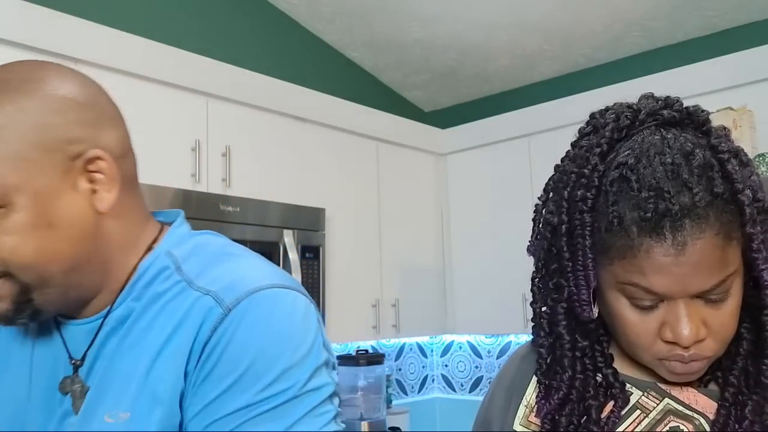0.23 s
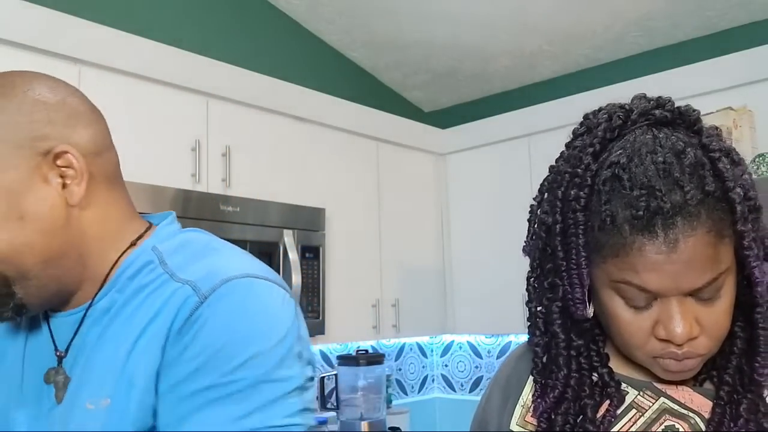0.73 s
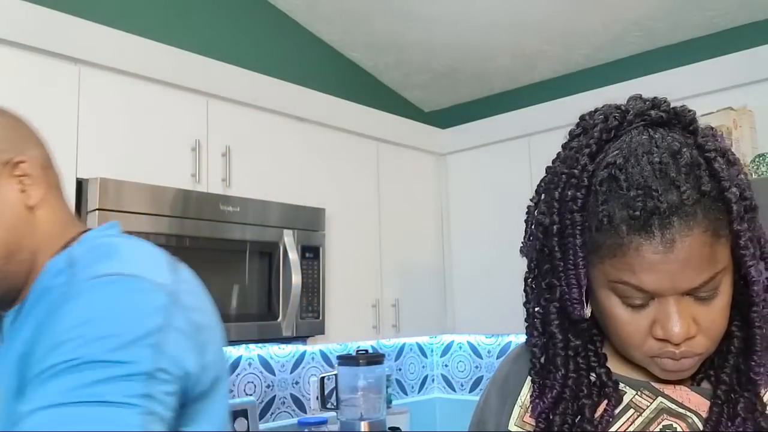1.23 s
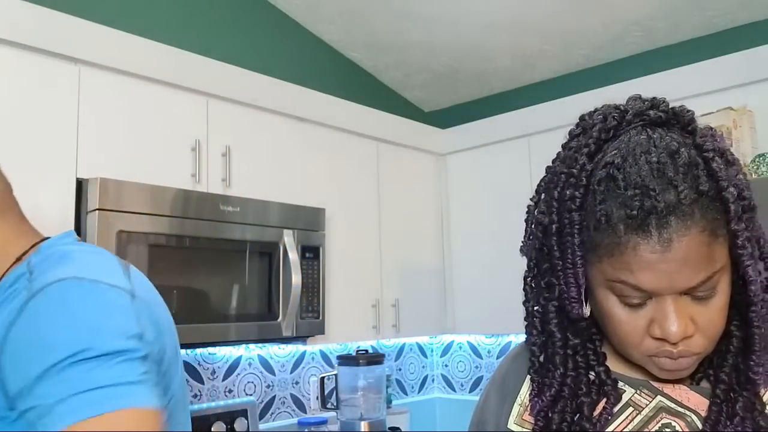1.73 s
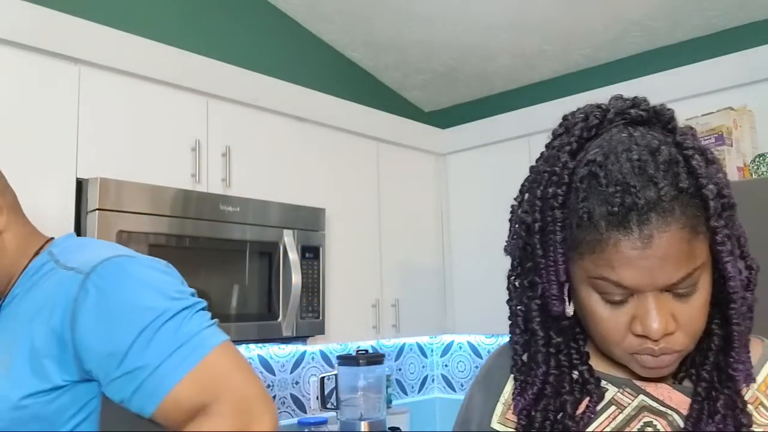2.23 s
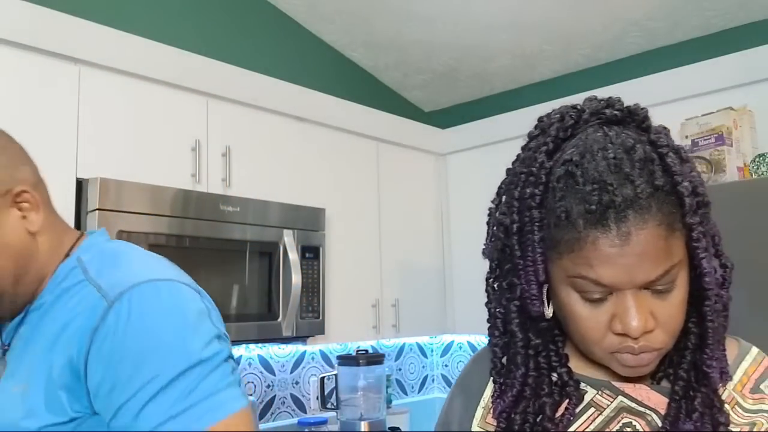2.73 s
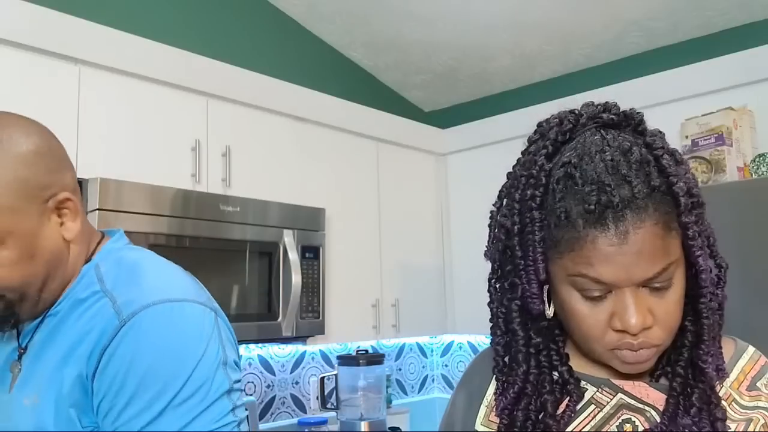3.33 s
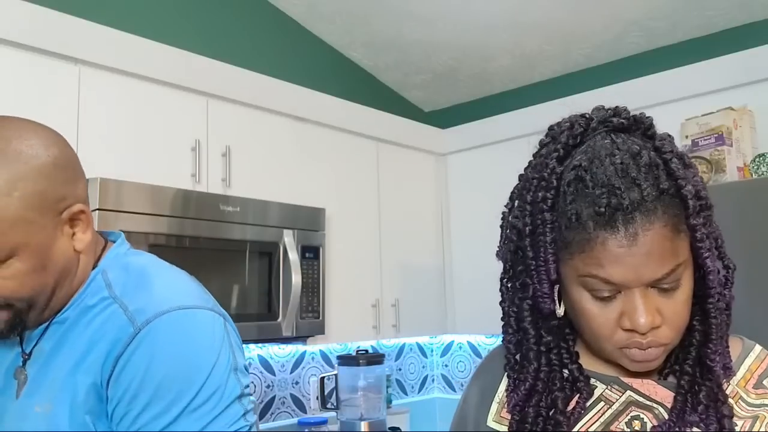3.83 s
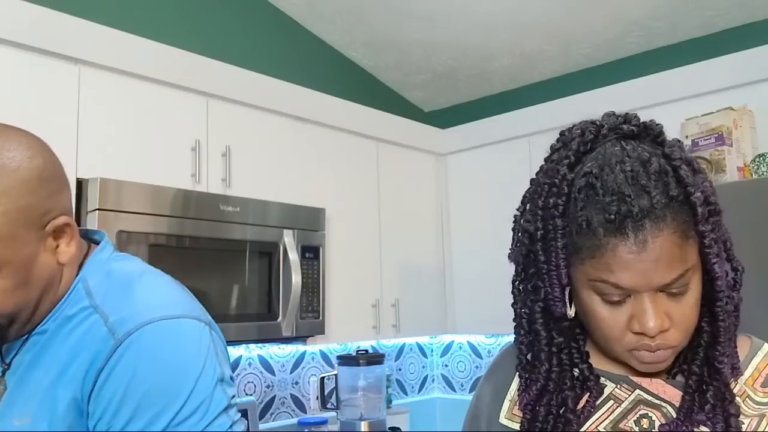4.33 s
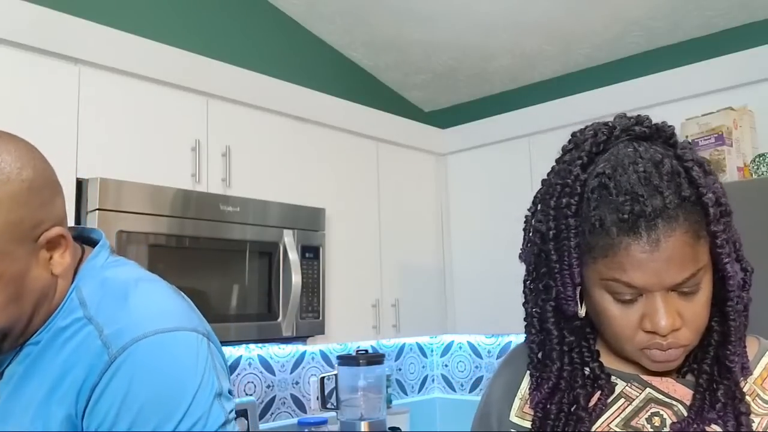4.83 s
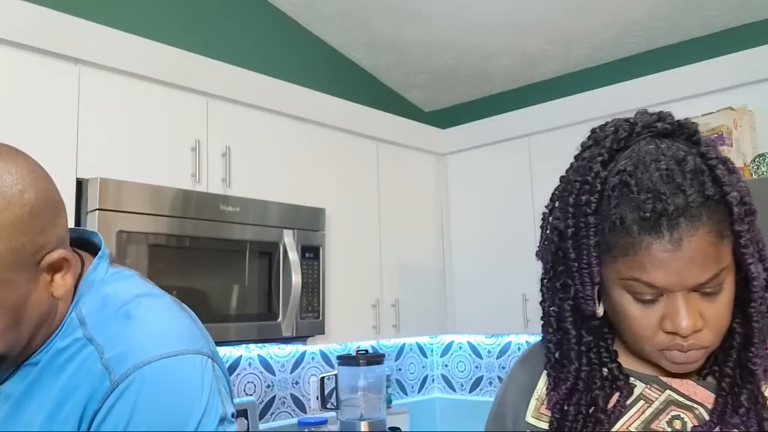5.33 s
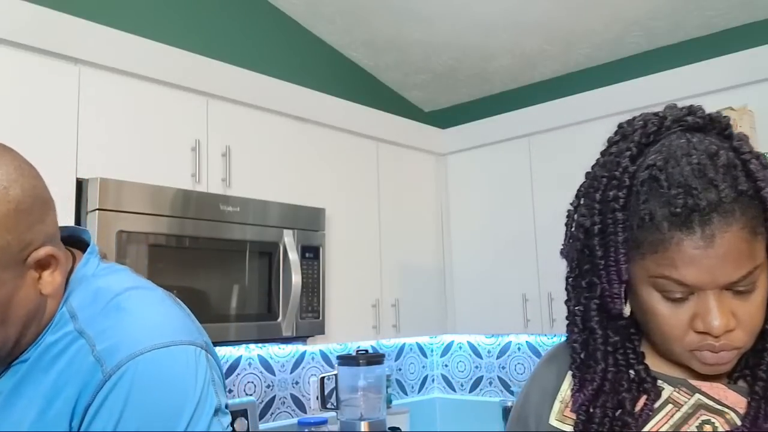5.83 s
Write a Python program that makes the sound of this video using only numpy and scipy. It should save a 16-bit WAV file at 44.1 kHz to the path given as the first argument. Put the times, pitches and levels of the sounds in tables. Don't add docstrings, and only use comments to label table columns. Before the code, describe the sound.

A knife cuts firm fruit on a board, heard close with short hard-room reflections. Small taps and a sliding scrape come first, then the loudest thud, a rumbling metallic rattle and woody rebounds. After a gap, several quick blows crack the rind amid ringing blade noise. Subdued rubs, soft bumps and low room hum follow, ending with crisp little cuts and light knocks.

```python
import sys
import numpy as np
from scipy import signal
from scipy.fft import rfft, irfft
from scipy.io import wavfile
from scipy.ndimage import uniform_filter1d

SR = 44100
rng = np.random.default_rng(int(sys.argv[2]) if len(sys.argv) > 2 else 0)


def gain_from_db(level_db):
    decades = np.asarray(level_db, float) / 20
    return 10 ** decades


def master(y):
    cut = np.clip(np.atleast_2d(y).T, -1, 1)
    pcm = np.round(cut * 32767)
    wavfile.write(sys.argv[1], SR, pcm.astype(np.int16))


N = 268745


def rms_one(x):
    return x / np.sqrt(np.mean(x ** 2) + 1e-20)


def highpass(x, hz):
    return signal.sosfilt(signal.butter(2, hz, "high", fs=SR, output="sos"), x)


def bandpass(x, order, low_hz, high_hz):
    return signal.sosfilt(signal.butter(order, [low_hz, high_hz], "band", fs=SR, output="sos"), x)


def at_hz(points, hz):
    table_hz, values = np.transpose(points)
    return np.interp(np.log(hz + 1), np.log(table_hz), values)


def envelope(curve):
    time_s, level_db = np.transpose(curve)
    return gain_from_db(np.interp(np.arange(N) / SR, time_s, level_db, left=-200, right=-200))


def swells(peak_s, db, rise_s, fall_s, edge, bend):
    t = np.arange(0, N + 16, 16)[:, None] / SR - peak_s
    loss = np.maximum(-t / rise_s, 0) ** edge + np.maximum(t / fall_s, 0) ** bend
    gain = gain_from_db(np.max(db - 20 * loss, axis=1))
    return np.interp(np.arange(N) / 16, np.arange(len(t)), gain)


def colour(x, spectrum):
    cepstrum = irfft(np.log(gain_from_db(at_hz(spectrum, np.fft.rfftfreq(4096, 1 / SR)))))
    cepstrum[1:2048] *= 2
    cepstrum[2049:] = 0
    taps = irfft(np.exp(rfft(cepstrum)))
    return signal.fftconvolve(x, taps / np.sqrt(np.sum(taps ** 2)))[:N]


def grains(per_s, spread_db):
    sizes = gain_from_db(spread_db * np.minimum(rng.exponential(1, N), 5)) * rng.choice([-1, 1], N)
    return rms_one(sizes * (rng.random(N) < per_s / SR))


def ring(x, hz, t60_s):
    radius = gain_from_db(-60 / (t60_s * SR))
    w = 2 * np.pi * hz / SR
    return signal.lfilter([0, np.sin(w)], [1, -2 * radius * np.cos(w), radius ** 2], x + 1e-18)


def body(drive, pitches_hz, modes, patchy_db):
    out = np.zeros(N)
    live = np.flatnonzero(np.abs(drive) > 1e-7)
    span = slice(live[0], live[-1] + SR // 2)
    steps = np.arange(len(drive[span])) / 1024
    wander = gain_from_db(patchy_db * rng.standard_normal((len(modes), int(steps[-1]) + 2)))
    for hz, (width_hz, db), feed in zip(pitches_hz, modes, wander):
        fed = drive[span] * np.interp(steps, np.arange(len(feed)), feed)
        t60_s = np.log(1000) / (np.pi * width_hz)
        out[span] += gain_from_db(db) * rms_one(ring(fed, hz, t60_s))
    return out * np.std(drive[span])


def strike(hits, modes, spread_db):
    out = np.zeros(N)
    time_s, hit_db = np.transpose(hits)
    at = [round(s * SR) for s in time_s]
    luck = rng.standard_normal((len(modes), len(at)))
    for (hz, db, t60_s), mode_luck in zip(modes, luck):
        clicks = np.zeros(N)
        clicks[at] = gain_from_db(hit_db + db + spread_db * mode_luck)
        out += ring(clicks, hz, t60_s)
    return out


def board():
    # (time [s], peak level [dB], knock pitch [Hz], contact length [s], board ring [dB])
    chops = [(0.246, -31, 330, 0.005, -8.5), (0.286, -33, 240, 0.006, -5), (0.488, -49, 990, 0.0041, -2.5),
             (1.128, -15.5, 252, 0.00087, -17.5), (1.135, -7.5, 270, 0.0071, 3),
             (2.128, -30, 263.5, 0.0092, -2), (2.131, -33, 527, 0.0081, -7),
             (2.184, -35.5, 485, 0.012, -16), (2.2575, -19, 720, 0.005, -4), (2.2435, -30, 497, 0.002, -14),
             (2.275, -16.5, 288, 0.01, -7), (2.292, -18, 417, 0.0056, -5.5), (2.268, -24, 800, 0.0067, 1),
             (2.329, -18.5, 326.2, 0.0041, -5), (2.341, -25.5, 480, 0.013, -7)]
    # (time [s], peak level [dB], knock pitch [Hz], contact length [s], board ring [dB])
    knocks = [(1.385, -12.5, 235, 0.0072, -27), (1.453, -21, 200, 0.0066, -22),
              (1.51, -30, 200, 0.0073, -12), (2.809, -51.5, 418, 0.01, 29.5),
              (2.868, -35.5, 257, 0.014, -6), (3.571, -47.5, 246.6, 0.035, -1),
              (4.322, -40, 254, 0.0066, -6), (5.259, -51, 249.6, 0.0089, -16),
              (5.698, -40.5, 257.7, 0.032, 11.5), (5.731, -42, 257, 0.012, -9),
              (5.822, -22, 423, 0.0036, -6.5), (5.828, -27, 496, 0.0069, -12),
              (5.861, -33, 253, 0.0077, -5), (5.892, -36.5, 249, 0.007, 9.5),
              (5.906, -37.5, 450, 0.0079, -16), (6.01, -34, 258, 0.0049, 3.5), (2.2513, 0, 325, 0.004, -15),
              (2.2467, 1.5, 932, 0.0015, -12), (2.2551, -1.5, 560, 0.0015, -14),
              (2.2712, -9.5, 880.4, 0.002, -8), (2.136, -28, 278, 0.0094, -11),
              (2.228, -34, 520, 0.008, -10), (1.1305, -9, 343, 0.0033, -22), (0.268, -33, 480, 0.008, -10)]
    # (frequency [Hz], level [dB], t60 [s])
    board_modes = [(250, -6, 0.22), (297, 4, 0.086), (320, -2, 0.067), (463, -1, 0.19), (572, -4, 0.18),
                   (700, -2, 0.25), (860, -8, 0.14), (1220, -12, 0.12)]
    blows = [(*row, -1.5, 0.00027) for row in chops] + [(*row, -26, 0.00075) for row in knocks]
    direct, ring_drive, t = np.zeros(N), np.zeros(N), np.arange(4000) / SR
    for s, db, hz, length_s, ring_db, rough_db, soft_s in blows:
        crush = rms_one(bandpass(rng.standard_normal(len(t)), 3, 220, hz * 3))
        swing = np.sin(2 * np.pi * hz * t) + gain_from_db(rough_db) * crush
        shape = (1 - np.exp(-(t / soft_s) ** 2)) * np.exp(-t / length_s)
        start = round(s * SR)
        blow = (gain_from_db(db) * swing * shape)[:N - start]
        direct[start:][:len(t)] += blow
        ring_drive[start:][:len(t)] += gain_from_db(ring_db) * blow
    ringing = sum(gain_from_db(db) * ring(ring_drive, hz, t60_s) for hz, db, t60_s in board_modes)
    return direct + gain_from_db(-58.5) * ringing


def tray():
    pitches_hz = [565, 685, 915, 965, 1030, 1169, 1310, 1677, 1776, 2048, 2137, 2185, 2234, 2573, 2830,
                  3250, 4043, 4807, 5450]
    # (width [Hz], level [dB])
    tray_modes = [(30, -18), (15.93, -5), (13.92, -21.5), (16.14, -29.5), (15.33, -15), (16.18, -11.5),
                  (15.86, -9.5), (16, -11.5), (18, -15), (34, -8), (30, -10.5), (30, -12), (30, -14),
                  (21.94, -9.5), (25, -20), (60, -25), (60, -23.5), (40.5, -23), (36.53, -28)]
    # (frequency [Hz], density [dB per Hz])
    buzz = [(60, -18.5), (130, -9), (300, -4), (600, -19), (1200, -12), (2200, -13.5), (3000, -28),
            (5000, -22.5), (8000, -46), (15500, -43)]
    times_s = np.cumsum([1.132, 0.021, 0.27, 0.13])
    shake = np.c_[times_s, [-45, -20, -39, -65]]
    drive = envelope(shake) * grains(4000, spread_db=2.5)
    modal = body(drive, pitches_hz, tray_modes, patchy_db=7)
    return gain_from_db(-12.5) * modal + gain_from_db(-3) * colour(drive, buzz)


def steel():
    # (peak time [s], level [dB], 20 dB rise [s], 20 dB fall [s], ring share [dB])
    clatter = [
        (.249, -44.5, 0.0087, 0.036, -12),
        (.36, -60.5, 0.0497, 0.054, -13),
        (.44, -53, 0.027, 0.028, -12.5),
        (.486, -72, 0.0093, 0.057, -19),
        (2.133, -25.5, 0.0087, 0.033, 4.5),
        (2.201, -29, 0.059, .07, 2.5),
        (2.236, -24, 0.022, 0.07, -3),
        (2.26, -21, 0.025, 0.07, -4),
        (2.292, -18, 0.016, 0.07, -3),
        (2.312, -20, 0.05, .13, -0.5),
    ]
    pitches_hz = [3676, 4421, 4790, 5443, 5675, 5822, 7000, 7817, 8219, 8463, 9420, 9823, 10100, 10530,
                  11150, 11681, 11960, 12250, 12890, 13900]
    # (width [Hz], level [dB])
    blade_modes = [(55, -16.5), (45, -11.5), (60, -17), (35, -17.5), (49.76, -14), (50, -9.5),
                   (49.7, -25.5), (44.7, -19), (45, -8), (45, -11), (39, -16), (40, -5), (45, -12),
                   (50.08, -5), (50, -20), (45, 0), (44.8, -10.5), (60.3, -9), (60, -15.5), (55, -12.5)]
    # (frequency [Hz], density [dB per Hz])
    rasp = [(300, -28.5), (600, -8.5), (1200, -6.5), (2500, -21), (4400, -6.5), (6300, -8.5), (9000, -11),
            (11000, -4), (13500, 3), (15800, -4)]
    # (time [s], level [dB])
    long_touches = [
        (2.35, -58),
        (2.405, -52),
    ]
    # (frequency [Hz], level [dB], t60 [s])
    long_modes = [(4421, 0, .8), (4423.2, -2, .68), (4434, -6, .6), (4404, -7, .45)]
    s, db, rise_s, fall_s, share_db = np.transpose(clatter)
    contacts = grains(9000, spread_db=2.5)
    rasp_drive = contacts * swells(s, db, rise_s, fall_s, edge=1.6, bend=1.2)
    ring_drive = contacts * swells(s, db + share_db, rise_s, fall_s, edge=1.6, bend=1.2)
    rings = body(ring_drive, pitches_hz, blade_modes, patchy_db=6)
    lasting = strike(long_touches, long_modes, spread_db=2.5)
    return gain_from_db(-8) * rings + gain_from_db(-1.5) * colour(rasp_drive, rasp) + lasting


def strokes():
    # (peak time [s], fizz level [dB], 20 dB rise [s], 20 dB fall [s], rub over fizz [dB])
    slices = [
        (2.81, -78, 0.04, 0.14, 12),
        (2.834, -64.5, 0.012, 0.14, 9.5),
        (2.915, -64.5, 0.0202, 0.13, 7.5),
        (5.07, -61.5, 0.127, 0.14, -2.5),
        (5.374, -53.5, 0.047, 0.11, 3.5),
        (5.5, -74, 0.11, 0.37, 1.5),
        (5.725, -57, 0.064, 0.13, 1.8),
        (5.86, -75, 0.15, 0.38, 11),
        (6.002, -52.5, 0.011, 0.21, -5.5),
        (6.045, -55, 0.063, 0.15, 0),
    ]
    # (peak time [s], fizz level [dB], 20 dB rise [s], 20 dB fall [s], rub over fizz [dB])
    brushes = [
        (.442, -71, 0.015, 0.035, -13),
        (3.624, -89, 0.066, 0.11, 10.5),
        (3.818, -89, .05, .12, 9.5),
        (3.976, -86, 0.0037, 0.051, 12),
        (4.165, -86, 0.024, .07, -1),
        (4.6, -88, 0.024, 0.064, -16.5),
        (4.68, -71.5, 0.03, 0.11, -21),
        (4.77, -74.5, 0.088, 0.12, -18.5),
        (4.86, -90.5, 0.09, .1, 15.5),
        (5.0, -66.5, 0.069, 0.23, -8),
    ]
    # (peak time [s], fizz level [dB], 20 dB rise [s], 20 dB fall [s], rub over fizz [dB])
    drags = [
        (0.03, -86.5, 0.12, 0.16, 8),
        (0.085, -84, .05, .08, 0),
        (0.256, -44.5, 0.0074, 0.17, 0),
        (0.488, -63.5, 0.023, 0.12, 7.5),
        (0.626, -72.5, 0.0077, 0.1, 5),
        (.68, -74.5, 0.013, 0.062, 9),
        (.78, -71, 0.26, 0.67, -0.3),
        (1.0, -66, 0.05, 0.2, -4.5),
    ]
    # (frequency [Hz], density [dB per Hz])
    fibres = [(2060, -29.5), (3500, -6.5), (3710, -5), (6230, -2), (7520, -8.5), (8280, 0.5), (9500, -11),
              (12400, -32), (20900, -120)]
    # (frequency [Hz], density [dB per Hz])
    flesh = [(180, -25), (300, -5.5), (529, 1), (870, -7.5), (1780, -9.5), (2280, -12.5), (4500, -18.5),
             (5850, -43.5), (9900, -120)]
    # (frequency [Hz], density [dB per Hz])
    skin = [(5290, -37), (9000, -7.5), (11300, -1.5), (15100, -5), (15800, -3.5)]
    hollows_hz = [520, 1400, 1800, 2300, 2650]
    # (width [Hz], level [dB])
    hollows = [(150, -8.5), (200, -6.5), (200, -6), (250, -6), (250, -9.5)]
    s, db, rise_s, fall_s, rub_db = np.transpose(slices + brushes + drags)
    skin_db = np.repeat([-2, 6, -4.5], [len(slices), len(brushes), len(drags)])
    tearing = grains(10000, spread_db=3.5)
    fizz = swells(s, db, rise_s, fall_s, edge=2.3, bend=0.92) * colour(tearing, fibres)
    rub = swells(s, db + rub_db, rise_s, fall_s, edge=2.3, bend=0.92) * grains(3000, spread_db=3)
    skin_s = s - np.minimum(0.008, rise_s / 4)
    fine = swells(skin_s, db + skin_db, rise_s, fall_s * 0.84, edge=2.3, bend=1.1) * colour(tearing, skin)
    hollow = body(rub, hollows_hz, hollows, patchy_db=7)
    return gain_from_db(-5) * fizz + gain_from_db(1.5) * colour(rub, flesh) + gain_from_db(-9.5) * hollow + gain_from_db(4) * fine


def ticks():
    # (time [s], peak level [dB], pitch [Hz], length [s])
    tick_events = [(0.2485, -19, 8150, 0.0036), (0.369, -38, 8000, 0.0083), (0.442, -67, 8470, 0.0045),
                   (0.626, -49, 7800, 0.0066), (0.679, -49.5, 8540, 0.0082), (1.07, -57.5, 8410, 0.033),
                   (1.131, -16, 7840, 0.013), (1.3167, -27, 10660, 0.024), (1.3836, -24.5, 10650, 0.0214),
                   (1.625, -52, 9850, 0.012), (2.143, -43, 11450, 0.0044), (2.834, -61.5, 7500, 0.0067),
                   (2.908, -50, 10600, 0.0041), (2.83, -49, 3800, 0.0098), (2.903, -53, 2400, 0.0055),
                   (.345, -55, 9000, .01), (5.827, -62, 1200, .005), (5.904, -46, 790, .005),
                   (5.99, -55, 2000, .008), (5.345, -56, 1700, .02), (5.05, -60, 1700, .03),
                   (3.975, -69, 8180, 0.0059), (4.15, -69.5, 9700, 0.0059), (4.5798, -69, 8630, 0.0052),
                   (4.655, -61.5, 10480, 0.0078), (2.186, -33, 2000, .01), (2.229, -33, 3700, .007),
                   (2.247, -22, 1900, .0015), (2.132, -35, 2300, .008), (2.163, -38, 3000, .006)]
    out, t = np.zeros(N), np.arange(3000) / SR
    for s, db, hz, length_s in tick_events:
        burst = bandpass(rng.standard_normal(len(t)), 2, hz * 0.67, min(hz * 1.39, 19000))
        out[round(s * SR):][:len(t)] += gain_from_db(db - 3) * burst * np.exp(-t / length_s)
    return out


def squeaks():
    # (time [s], pitch [Hz], length [s])
    rubs = [(0.43, 3673, 0.05), (0.43, 4477, 0.06), (0.62, 2808, 0.4), (0.7, 1889, 0.33), (0.44, 8477, 0.1),
            (0.27, 2405, 0.05), (0.27, 2739, 0.04), (0.45, 2780, 0.07), (0.44, 1968, 0.1),
            (1.14, 1176, 0.035), (1.19, 1165, 0.11), (1.15, 4074, 0.05), (1.2, 4042, 0.065),
            (1.155, 2136, 0.06), (1.235, 2139, 0.09), (1.185, 4805, 0.13), (1.16, 1686, 0.04),
            (1.235, 1772, 0.03), (1.18, 1028, 0.04), (1.31, 1299, 0.07), (1.25, 913, 0.12),
            (1.17, 567, 0.06), (1.14, 684, 0.08), (1.35, 3303, 0.15), (1.54, 2135, 0.07),
            (1.195, 2828, 0.05), (2.13, 1003, 0.04), (2.185, 1120, 0.015), (2.185, 891, 0.02),
            (2.13, 2785, 0.06), (2.13, 3672, 0.11), (2.145, 6961, 0.045), (2.185, 4424, 0.03),
            (2.265, 5825, 0.045), (2.28, 3682, 0.04), (2.3, 8205, 0.025), (2.31, 5674, 0.06),
            (2.32, 5441, 0.06), (2.3, 11678, 0.05), (2.405, 4420, 0.1), (2.51, 4425, 0.11),
            (2.64, 4428, 0.19), (2.4, 5674, 0.15), (2.48, 3675, 0.08), (2.9, 1547, 0.07), (2.9, 2484, 0.03),
            (2.93, 2334, 0.12), (3.575, 1542, 0.07), (3.575, 2578, 0.06), (3.785, 2614, 0.025),
            (4.58, 8705, 0.1), (4.6, 10688, 0.15), (5.04, 1847, 0.07), (5.335, 1797, 0.045),
            (5.34, 1394, 0.03), (5.36, 522, 0.04), (5.87, 427, 0.06), (0.249, 232, 0.068),
            (1.41, 712, 0.09), (1.17, 230, 0.1)]
    rub_levels_db = [-73.5, -73, -86.5, -83, -80, -62, -62, -75.5, -77, -20, -34, -42, -39, -33, -37, -51,
                     -34, -32.5, -31, -39.5, -46, -46, -40, -62.5, -65, -46, -52, -46.5, -51, -49.5, -47.5,
                     -40.5, -45.5, -34.5, -34.5, -32, -40, -46, -31, -52.5, -54.5, -65.5, -56, -61.5, -69,
                     -75, -82, -74, -80, -83, -85, -88, -72, -61.5, -67.5, -57, -52, -35.5, -51, -30]
    rise_s, fall_s, wobble_db = 0.0017, 0.0066, 3.5
    ease = 0.06
    wander = 0.0008
    out, t = np.zeros(N + SR), np.arange(SR // 2) / SR
    for (s, hz, length_s), db in zip(rubs, rub_levels_db):
        drift, wobble = rng.standard_normal((2, len(t)))
        release = np.exp(-np.maximum(t - length_s, 0) / (fall_s + ease * length_s))
        shape = (1 - np.exp(-t / rise_s)) * release
        uneven_db = wobble_db * rms_one(uniform_filter1d(wobble, size=500))
        phase = 2 * np.pi * hz * t + wander * np.sqrt(hz) * np.cumsum(drift)
        out[round(s * SR):][:len(t)] += gain_from_db(db + 5 + uneven_db) * shape * np.sin(phase)
    return out[:N]


def counter_drum():
    # (time [s], level [dB])
    drum_hits = [
        (.249, -41),
        (1.134, -14),
        (1.386, -28.5),
        (1.457, -32),
        (1.52, -41),
        (2.256, -46.5),
        (5.83, -56),
        (5.99, -61),
    ]
    # (frequency [Hz], level [dB], t60 [s])
    counter_modes = [(119, -5, .5), (227, 1, .8), (344, 1, .85), (445, -8, .35)]
    # (time [s], level [dB])
    hand_damps = [
        (0, -1.5),
        (1.41, -1.5),
        (1.44, -18),
        (2, -9.5),
        (2.1, -5),
        (6.1, 1),
    ]
    return highpass(strike(drum_hits, counter_modes, spread_db=1.5), 75) * envelope(hand_damps)


def bowl():
    # (time [s], level [dB])
    touches = [
        (.248, -37.5),
        (.298, -42),
        (.392, -51),
        (.68, -67),
    ]
    # (frequency [Hz], level [dB], t60 [s])
    bowl_modes = [(1464, 0, .16), (1467, -7, .75), (1484, -8, .12)]
    return strike(touches, bowl_modes, spread_db=0)


def cabinet_thuds():
    # (time [s], level [dB])
    shifts = [(.26, -50.5), (.33, -54), (1.46, -44), (1.53, -57), (2.87, -58.5), (3.15, -64), (3.6, -64),
              (4.8, -66), (5.2, -57), (5.7, -55), (5.82, -47), (5.92, -49), (6.03, -47.5)]
    # (frequency [Hz], level [dB], t60 [s])
    cabinet_modes = [(62, -11, 0.2), (87.5, -5, 0.2), (124.3, 1, 0.22)]
    return highpass(strike(shifts, cabinet_modes, spread_db=5.5), 55)


def hum():
    # (time [s], level [dB])
    hum_swell = [(0, 1), (.6, 1.5), (1.1, 2.5), (2, 0), (2.7, 4), (3.3, -2.5), (3.6, 1.5), (4.2, 0.5),
                 (4.6, 1.5), (5, 4), (5.3, 3.5), (5.6, 2), (5.9, 11), (6.09, -1.5)]
    # (frequency [Hz], density [dB per Hz])
    hum_spectrum = [(20, -46.5), (55, -16), (85, -26), (122, -3), (165, -16.5), (260, -1), (370, -5.5),
                    (530, -16), (930, -22), (1500, -35.5), (3000, -50.5), (7000, -50.5), (8300, -45),
                    (15800, -55)]
    return gain_from_db(-56.5) * envelope(hum_swell) * colour(rng.standard_normal(N), hum_spectrum)


def kitchen(x):
    # (frequency [Hz], t60 [s])
    decay = [(100, .5), (300, .55), (800, .5), (2000, .53), (5000, .5), (10000, .4), (15000, .3)]
    # (frequency [Hz], level [dB])
    room_tone = [(100, -5), (300, -1.5), (800, -2.5), (3000, 0.5), (12000, -1)]
    t, tail = np.arange(SR) / SR, np.zeros(SR)
    edges_hz = 60 * 2 ** np.arange(0, 8.5, 1.0)
    for low_hz, high_hz in zip(edges_hz, np.append(edges_hz[1:], 19000)):
        band = bandpass(rng.standard_normal(SR), 2, low_hz, high_hz)
        t60_s = at_hz(decay, np.sqrt(low_hz * high_hz))
        tail += band * gain_from_db(at_hz(room_tone, low_hz)) * gain_from_db(-60 * t / t60_s)
    tail *= 1 - np.exp(-t / 0.0016)
    return signal.fftconvolve(x, tail / np.sqrt(np.sum(tail ** 2)))[:N]


def scene():
    hard = highpass(board() + tray() + steel() + ticks(), 110)
    light = strokes() + counter_drum() + bowl() + cabinet_thuds()
    singing = squeaks()
    reflected = kitchen(hard + gain_from_db(-3.5) * light + gain_from_db(-9) * singing)
    return (hard + light + singing + gain_from_db(-5) * reflected + hum())[None]


def low_pass(x):
    return signal.sosfilt(signal.butter(12, 16640, fs=SR, output="sos"), x)


def record(dry):
    # (frequency [Hz], level [dB])
    microphone = [(7000, 0), (8300, 1), (9300, -1.5), (11200, 2), (12300, -1), (14500, -1), (15700, 2)]
    limit = 0.75
    x = highpass(gain_from_db(0.1) * colour(dry[0], microphone)[None], 45)
    x = highpass(limit * np.tanh(x / limit), 35)
    x = signal.sosfilt(signal.cheby2(18, 45, 16150, fs=SR, output="sos"), x)
    return low_pass(x)


dry = scene()
out = record(dry)
master(out)
```